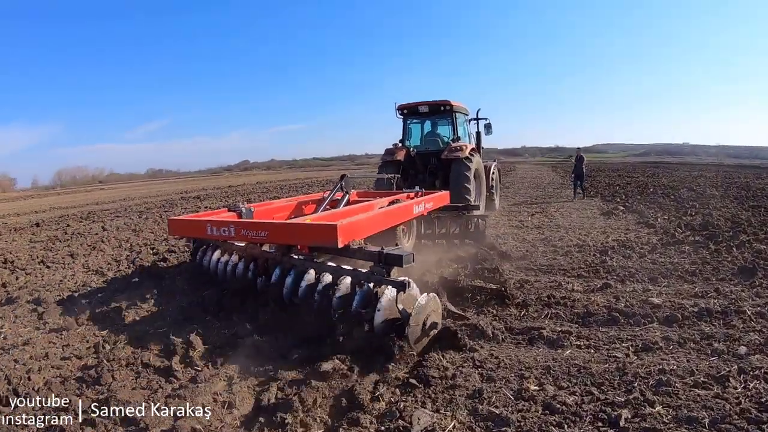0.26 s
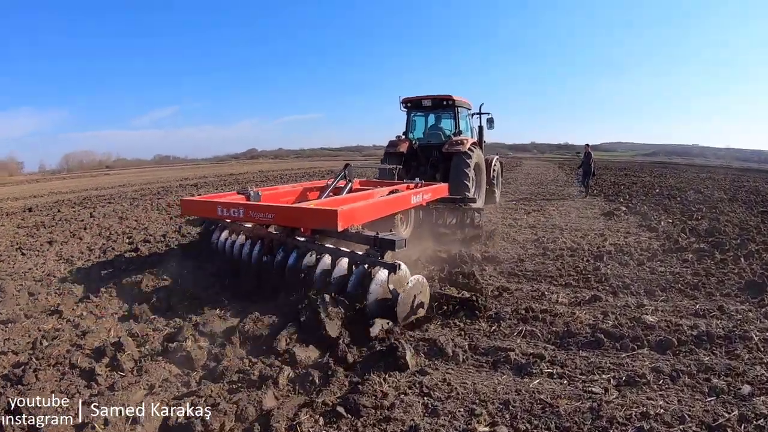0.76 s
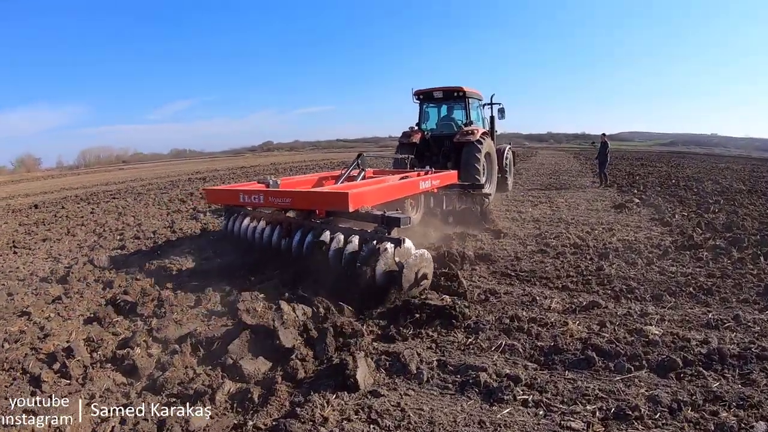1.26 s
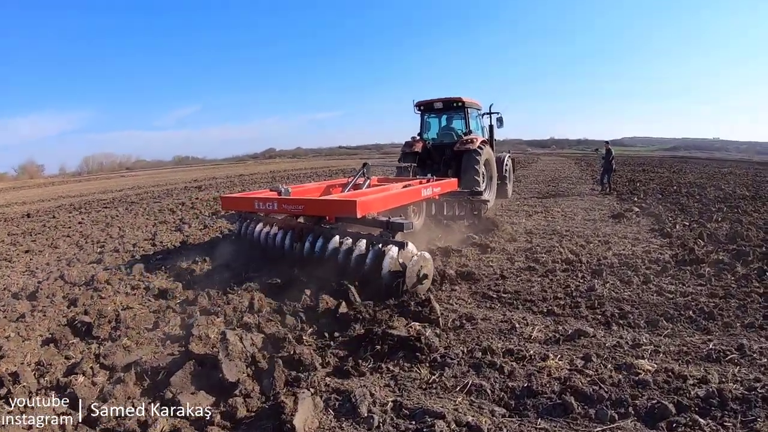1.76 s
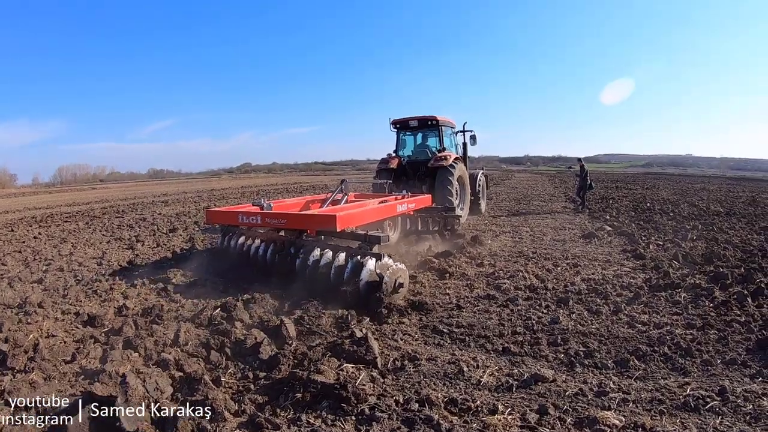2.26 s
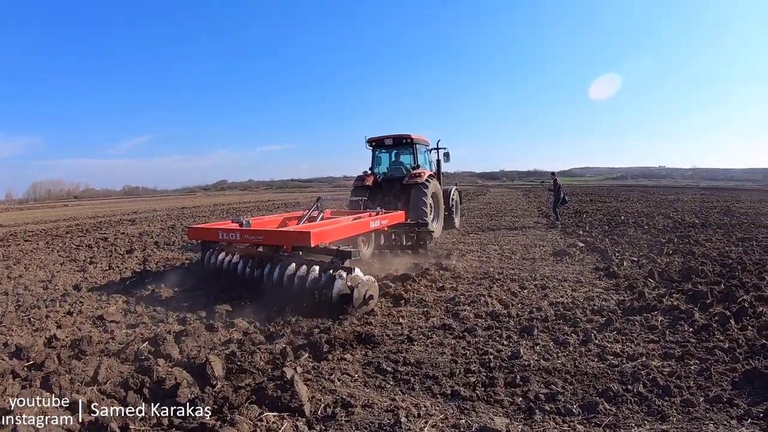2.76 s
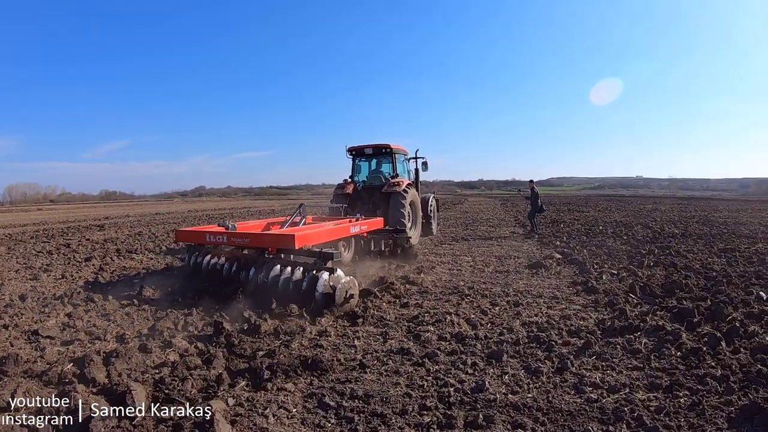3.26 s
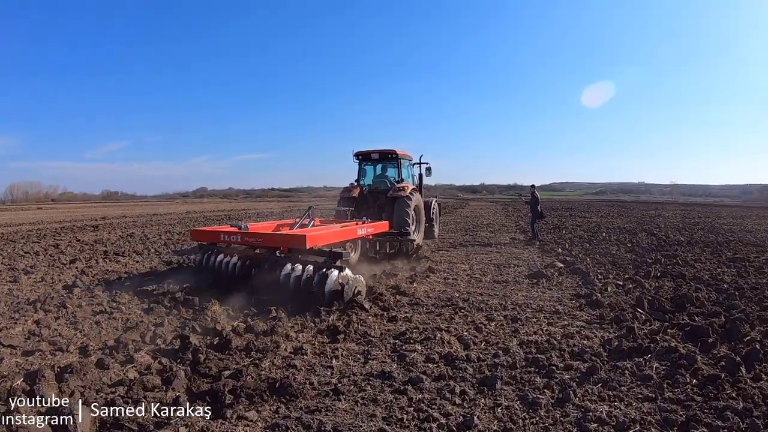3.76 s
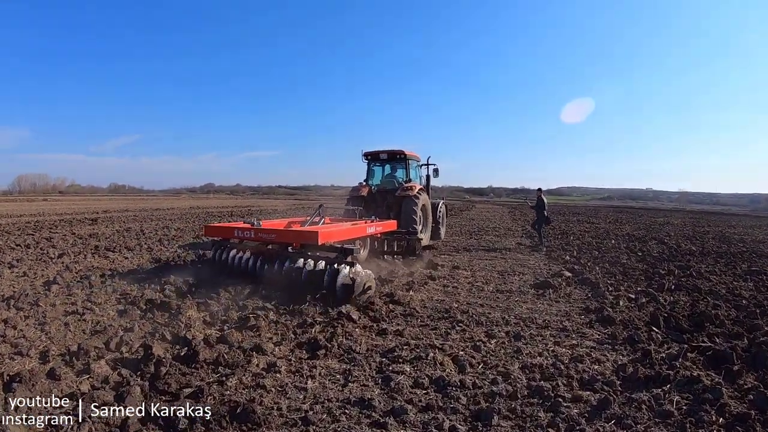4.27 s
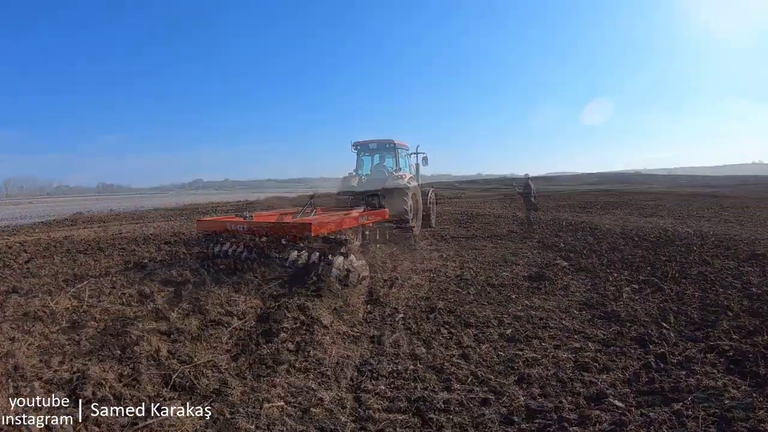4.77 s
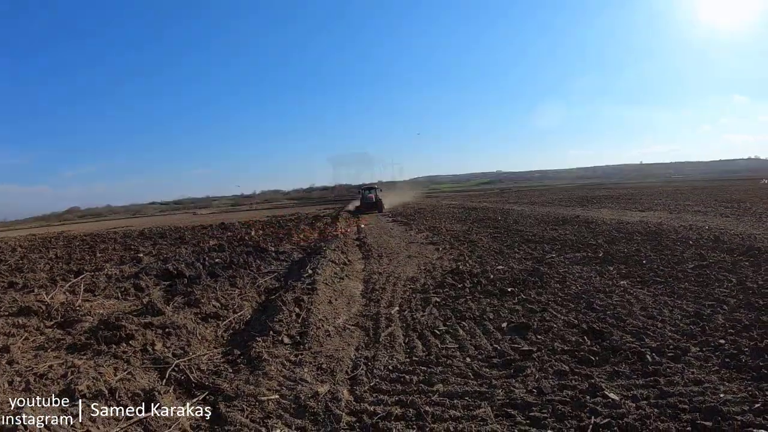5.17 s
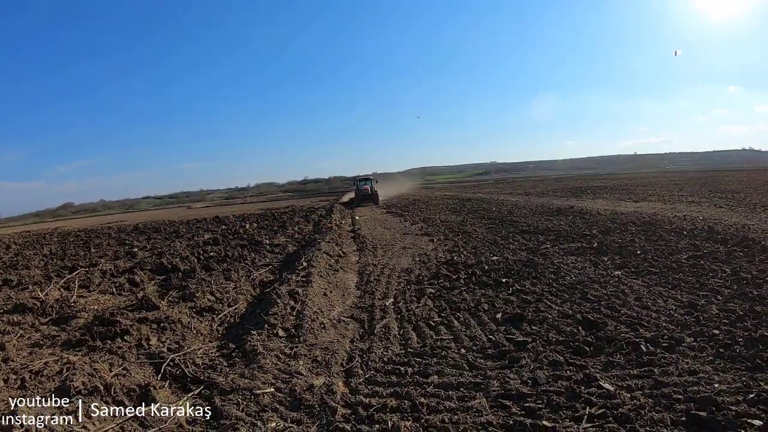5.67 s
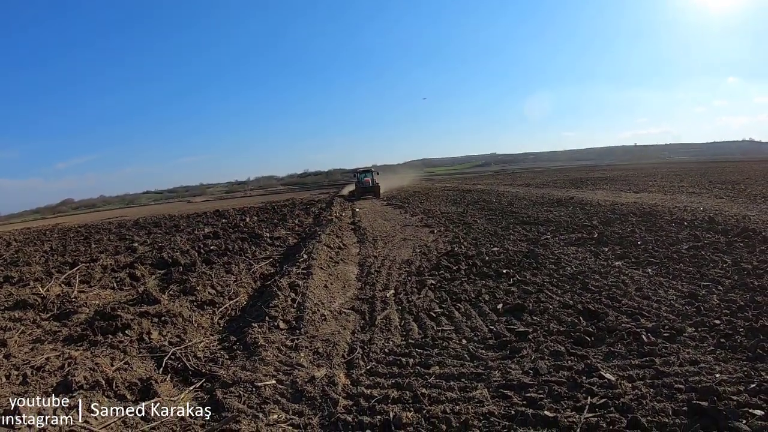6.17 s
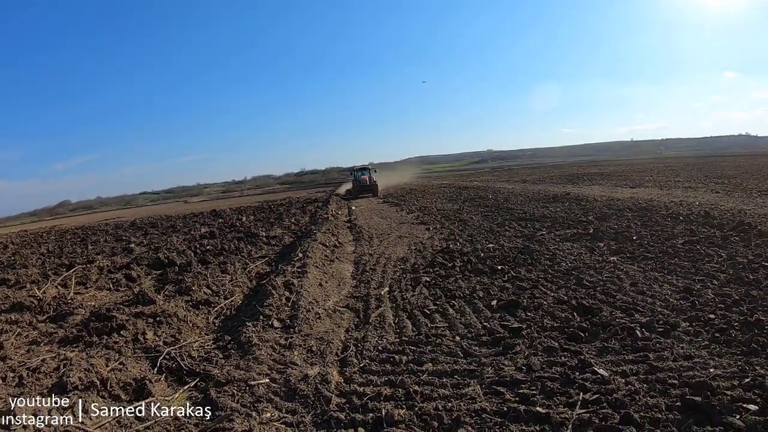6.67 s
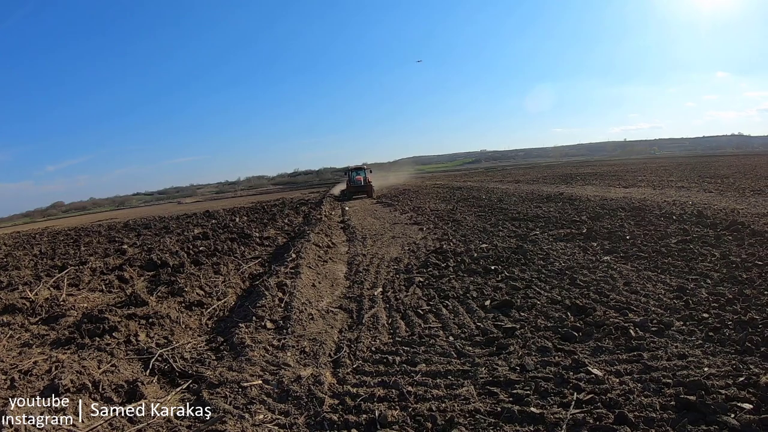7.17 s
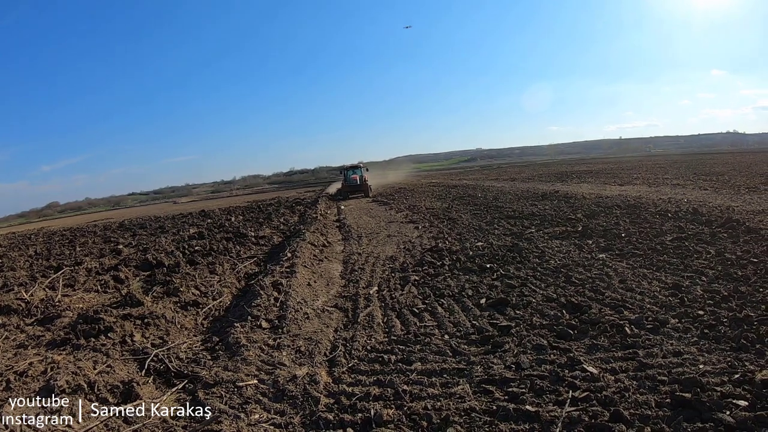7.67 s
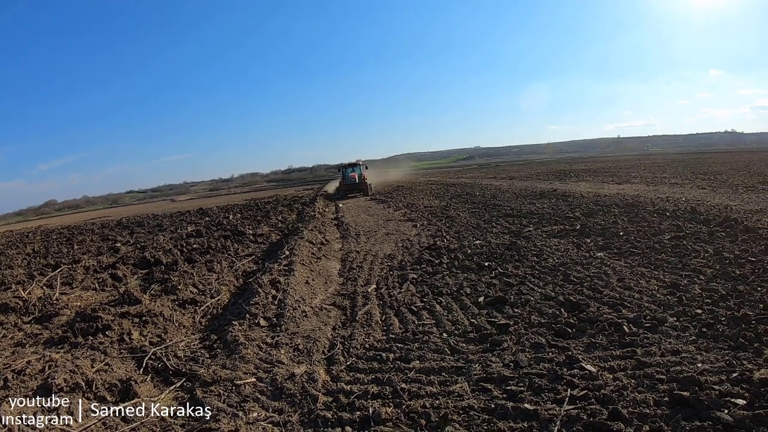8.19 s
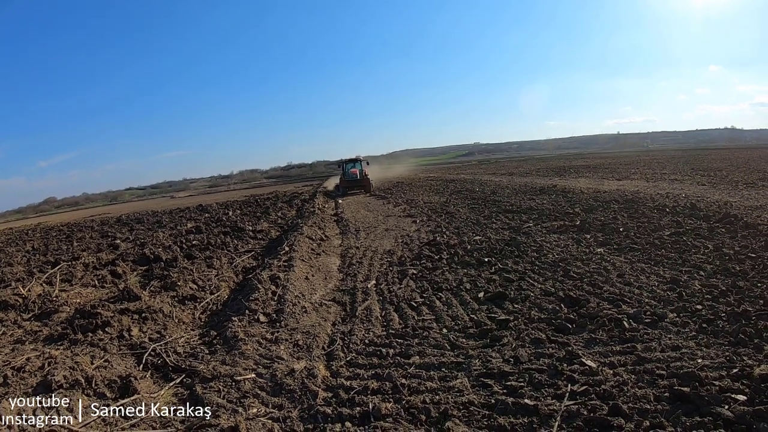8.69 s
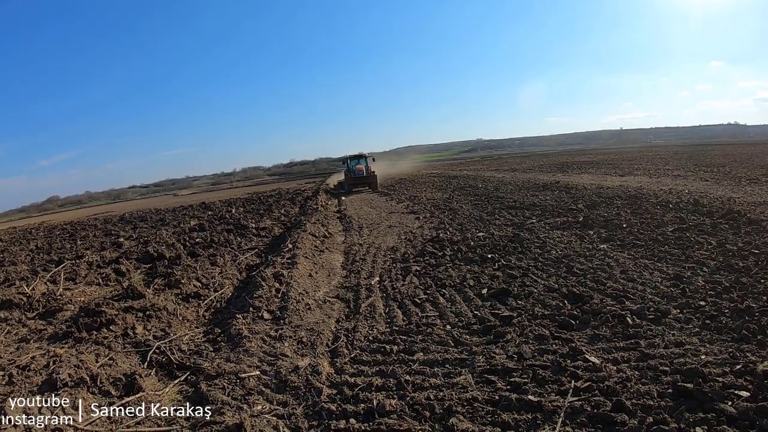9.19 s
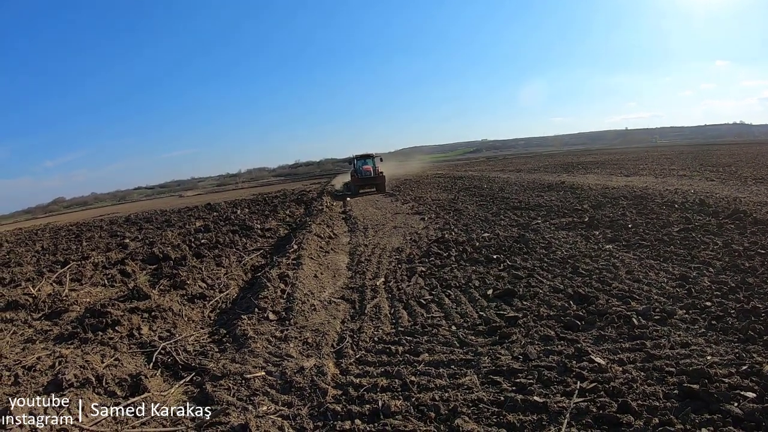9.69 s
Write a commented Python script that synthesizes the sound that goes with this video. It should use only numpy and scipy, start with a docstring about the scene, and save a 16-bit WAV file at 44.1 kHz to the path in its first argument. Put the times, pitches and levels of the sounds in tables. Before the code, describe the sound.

Steady low diesel drone, soil crackle and short steel squeaks up close; a short gap, then a distant pulsing exhaust with wind thumps and rustle.

```python
"""Tractor and disc harrow, open field

A four-cylinder diesel drags discs through dry soil, heard first from a few metres behind.
Lines locked to the firings make its drone, gated noise its clatter, random clicks the crumbling clods,
and sliding sines its gear whine and squealing disc. After a short silence it is heard from far ahead,
coming nearer: noise barks through stack resonances and an inverted ground echo, with breeze and rustle."""
import sys
import numpy as np
from scipy import signal
from scipy.fft import rfft, irfft
from scipy.io import wavfile
from scipy.ndimage import uniform_filter1d

SR = 44100
rng = np.random.default_rng(int(sys.argv[2]) if len(sys.argv) > 2 else 0)


def log_audio(samples):
    """Write samples as a 16-bit WAV file to the path given in sys.argv[1]."""
    # one column per channel
    frames = np.atleast_2d(samples).T
    # limit to full scale, then quantise
    limited = np.clip(frames, -1, 1)
    pcm = np.round(limited * 32767).astype(np.int16)
    wavfile.write(sys.argv[1], SR, pcm)


N = 438354
TIME = np.arange(N) / SR
HZ = np.maximum(np.arange(N // 2 + 1) * SR / N, 1)
LEFT_RIGHT = np.array([[1], [-1]])


def from_db(db):
    """Turn decibels into gain."""
    return 10 ** (np.asarray(db) / 20)


def rms_one(x):
    """Scale to unit rms."""
    return x / np.sqrt(np.mean(x ** 2) + 1e-20)


def in_time(rows):
    """Join each column of a timed table by straight lines, at every sample."""
    s, *columns = np.transpose(rows)
    return [np.interp(TIME, s, column) for column in columns]


def over_hz(points):
    """Join a table by straight lines on a log-frequency axis."""
    hz, value = np.transpose(points)
    return np.interp(np.log(HZ), np.log(hz), value)


def colour(x, spectrum):
    """Filter to a spectrum that falls steeply beyond its ends; rms 1."""
    low_end = 1 / (1 + (spectrum[0][0] / HZ) ** 4)
    high_end = 1 / (1 + (HZ / spectrum[-1][0]) ** 8)
    return rms_one(irfft(rfft(x) * from_db(over_hz(spectrum)) * low_end * high_end, N))


def white():
    """Two unrelated white noises."""
    return rng.standard_normal((2, N))


def drift(rate_hz):
    """Slow random wandering with spread 1: noise that falls steeply above the rate."""
    return rms_one(irfft(rfft(rng.standard_normal(N)) / (1 + (HZ / rate_hz) ** 2) ** 2, N))


def resonate(x, modes):
    """Parallel two-pole resonances, each scaled to its own rms level."""
    out = 0
    for hz, width_hz, db in modes:
        radius = np.exp(-np.pi * width_hz / SR)
        poles = [1, -2 * radius * np.cos(2 * np.pi * hz / SR), radius * radius]
        band = signal.lfilter([1, 0, -1], poles, x)
        out = out + from_db(db) * rms_one(band)
    return out


def spread(pair, width, balance):
    """Two unrelated signals become the mid and side of a stereo image."""
    mid, side = rfft(pair)
    image = mid + LEFT_RIGHT * side * from_db(over_hz(width))
    return irfft(image * from_db(LEFT_RIGHT * over_hz(balance) / 2), N)


def sinking(db, loss_db_per_s, since_s=0):
    """A level in dB that falls evenly with time; a negative loss makes it rise."""
    return db - loss_db_per_s * (TIME - since_s)


def bumps(rows, width_s):
    """A bell-shaped bump for each (time, height)."""
    return sum(height * np.exp(-((TIME - s) / width_s) ** 2) for s, height in rows)


def swells(rows, width_s):
    """The gain of short swells, each given by (time, peak dB)."""
    return bumps([(s, from_db(db)) for s, db in rows], width_s)


def grains(per_s):
    """Random clicks of unequal size, now denser and now sparser."""
    born = rng.random((2, N)) < per_s * from_db(drift(12)) / SR
    size_db = 2 * np.minimum(rng.exponential(1, (2, N)), 4)
    return rms_one(born * white() * from_db(size_db))


def engine_speed(trend, hunt):
    """Firings per second: the load sets the trend, the governor swings around it."""
    per_s, depth, crest_s = hunt
    return in_time(trend)[0] + depth * np.cos(2 * np.pi * per_s * (TIME - crest_s))


def crank(speed, jitter):
    """Firings counted since the start; the speed is never quite even."""
    return np.cumsum(speed * (1 + jitter * drift(21.7))) / SR


# Strength of the four cylinders' bangs, in firing order. Each row: level in dB.
BANG_DB = [1.6, -.2, -1.1, -.3]


def bangs(firings, start, peak, steady):
    """Each firing's burst rises and dies on a steady share; start and peak in firing cycles; rms 1."""
    number, age = np.divmod(firings + 1 - start, 1)
    number = number.astype(int)
    chance_db = 1.3 * rng.standard_normal(size=1000)[number]
    strength = from_db(np.array(BANG_DB)[number % len(BANG_DB)] + chance_db)
    burst = (age / peak * np.exp(1 - age / peak)) ** 2
    return rms_one(steady + strength * burst)


# One cylinder thuds harder than the others as its valve opens. Each row: level in dB.
THUD_DB = [-3, -1, 4, -3]
# Dull colour of a thud. Each row: frequency in Hz, relative level in dB.
THUD_COLOUR = [(200, 0), (900, 0)]


def thuds(firings, start, chance_db):
    """One dull pressure pulse per firing, in the pattern of the cylinders."""
    number = (firings + 1 - start).astype(int)
    chance = chance_db * rng.standard_normal(size=1000)[number]
    strength = from_db(np.array(THUD_DB)[number % len(THUD_DB)] + chance)
    pulses = np.diff(number, prepend=number[0])
    return colour(pulses * strength, THUD_COLOUR)


def drone(firings, orders, waver_db, uneven_db, octave_sag_db):
    """Exhaust lines add up to one suction dip in the middle of each cycle, its depth varying by chance."""
    out = 0
    for order, db in orders:
        unsteady_db = waver_db * np.sqrt(max(abs(db) - .5, 0))  # weak lines come and go most
        smear = np.pi / 10 * (order - 1) ** 2  # the silencer holds back the higher lines
        level_db = db + unsteady_db * drift(9.9) - octave_sag_db * (order == 2)
        out = out - from_db(level_db) * np.cos(2 * np.pi * order * (firings - .5) - smear)
    chance = rng.standard_normal(size=1000)
    depth_db = uneven_db * np.interp(firings - .5, np.arange(len(chance)), chance)
    return rms_one(out * from_db(depth_db))


# Left and right alike: the far tractor and the air sit in the middle.
# Each row: frequency in Hz, left minus right in dB.
CENTRED = [(100, 0), (8000, 0)]
# Gusts thumping on the microphone. Each row: time in seconds, peak in dB.
GUST_PEAKS = [(5.2, -37.5), (5.92, -33), (6.25, -43), (6.85, -51), (7.13, -39), (7.35, -36), (9.75, -40)]
# Colour of wind on the microphone. Each row: frequency in Hz, relative level in dB.
WIND_COLOUR = [(12, -6), (28, 8.5), (45, 1), (90, -3), (200, -22.5), (500, -50)]
# Stereo width of the wind. Each row: frequency in Hz, side minus mid in dB.
WIND_SIDE = [(30, -33), (200, -34)]


def breeze():
    """Low noise: lumps of wind thump on the microphone above a light, unsteady breeze."""
    blowing = from_db(-47) + swells(GUST_PEAKS, width_s=0.06)
    wind = blowing * from_db(1.6 * drift(5.4)) * colour(white(), WIND_COLOUR)
    return spread(wind, WIND_SIDE, CENTRED)


RUSTLE_FULL_S, RUSTLE_FULL_DB, RUSTLE_RISE_DB_PER_S = 8.57, -53, 26
# Swishes on top of the rustle. Each row: time in seconds, peak in dB.
SWISH_PEAKS = [(8.92, -51), (9.18, -48.5)]
# Bright colour of the rustle. Each row: frequency in Hz, relative level in dB.
RUSTLE_COLOUR = [(2500, 24), (4500, 9), (6000, 7.5), (7800, 1.5), (8600, 0.5), (9600, 0.5), (11000, -9),
                 (13000, -16)]


def bright_rustle():
    """Dense fine clicks swell to a steady level, with two swishes on top."""
    rising_db = RUSTLE_FULL_DB - RUSTLE_RISE_DB_PER_S * np.maximum(RUSTLE_FULL_S - TIME, 0)
    gain = from_db(rising_db) + swells(SWISH_PEAKS, width_s=0.07)
    rustle = gain * colour(grains(per_s=11000), RUSTLE_COLOUR)
    return spread(rustle, [(3000, -3.5), (9000, -1.5)], CENTRED)


def delayed(x, lag_s):
    """Both channels, a number of seconds later."""
    return np.array([np.interp(TIME - lag_s, TIME, channel) for channel in x])


# Bounce off the field: its lag grows as the tractor nears, and its share ends up far smaller.
# Each row: time in seconds, lag in seconds, share of the direct sound.
GROUND_BOUNCE = [(5.2, .000545, .58), (5.6, .00056, .46), (6.15, .000565, .43), (6.9, .000635, .42),
                 (7.65, .000745, .5), (8.55, .000842, .46), (9.15, .000908, .22), (9.9, .00103, .2)]
ECHO_LOW_HZ = 1340  # the notches are shallow below this


def ground_echo(x):
    """The grazing ground echo is inverted and cuts notches that sink as its lag grows."""
    lag_s, share = in_time(GROUND_BOUNCE)
    ground = uniform_filter1d(delayed(x, lag_s), size=5, axis=1)  # rough soil scatters the treble
    high_pass = signal.butter(2, ECHO_LOW_HZ, "high", fs=SR, output="sos")
    ground = signal.sosfiltfilt(high_pass, ground)
    return (x - share * ground) / np.hypot(1, share)


FAR_START_S = 5.0
# Hard puffs of exhaust. Each row: time in seconds, peak in dB.
HARD_PUFF_PEAKS = [(5.074, -26), (5.091, -25), (5.127, -19.5), (5.178, -21), (5.208, -31)]
THUMP_WIDTH_S, RUSH_WIDTH_S, RUSH_DB = 0.0032, 0.016, -8  # the rush is relative to the thump
# Soft puffs as they sink. One row: level at the far start in dB, loss in dB per second.
FAR_PUFF_LEVEL = (-36, 0.7)
# Colour of the far puffs. Each row: frequency in Hz, relative level in dB.
FAR_PUFF_COLOUR = [(30, 2), (70, -4.5), (110, 0), (160, 1), (215, -4), (280, -12.5), (500, -19)]


def far_puffs(firings, lull_db):
    """Low noise puffs at each firing; each hard puff is a thump in a short rush of gas."""
    puffing = white()[0] * bangs(firings, start=0.02, peak=0.15, steady=0.87)
    soft_gain = from_db(sinking(*FAR_PUFF_LEVEL, FAR_START_S) - lull_db)
    rush_gain = from_db(RUSH_DB) * swells(HARD_PUFF_PEAKS, RUSH_WIDTH_S)
    thumps = swells(HARD_PUFF_PEAKS, 2 * THUMP_WIDTH_S) - 2 * swells(HARD_PUFF_PEAKS, THUMP_WIDTH_S)
    return (soft_gain + rush_gain) * colour(puffing, FAR_PUFF_COLOUR) + thumps


# Exhaust stack resonances. Each row: frequency in Hz, width in Hz, relative level in dB.
STACK_RINGS = [(394, 42, -9.5), (694, 51, -1), (995, 46, -2), (1422, 100, -5), (1820, 240, -9),
               (2254, 230, -14.5), (2563, 98, -13), (2878, 66, -12.5), (3178, 120, -15), (3520, 100, -20.5),
               (3830, 69, -20), (4190, 83, -25), (4470, 170, -28)]
# Gas rushing up the stack. Each row: frequency in Hz, relative level in dB.
STACK_RUSH_COLOUR = [(250, 0), (4500, 0)]
# Combustion clatter from afar. Each row: frequency in Hz, relative level in dB.
FAR_CLATTER_COLOUR = [(230, 14.5), (330, 9), (470, 9.5), (570, -0.5), (750, 7.5), (880, 4), (1100, 6),
                      (1270, -0.5), (1600, -1), (2200, -2.5), (2750, -7.5), (3400, -13.5), (4400, -26),
                      (5400, -24.5), (7800, -30.5), (11000, -50)]
# Level of the bark as it rises slowly. One row: level at the far start in dB, loss in dB per second.
BARK_LEVEL = (-40.5, -0.15)
# Harder barking for a while. Each row: time in seconds, extra level in dB.
HARDER_BARKS = [(5.65, 2.4), (9.3, 0.33)]
# Now and then one stack resonance rings out. Each row: time in seconds, frequency in Hz, peak in dB.
STACK_RING_OUTS = [(5.18, 2620, -52), (6.5, 2900, -51), (7.05, 2590, -55), (8.5, 3230, -50.5)]
RING_OUT_WIDTH_S, RING_OUT_WIDTH_HZ = .3, 70
BARK_OPENING_DB, OPENING_CUT_HZ, OPENING_DULLNESS = 5, 2800, 0.43  # dullness: share of treble taken away
# Stereo width of the bark. Each row: frequency in Hz, side minus mid in dB.
FAR_SIDE = [(400, -48), (800, -48), (1400, -47), (2200, -60), (4000, -58), (8000, -22)]


def exhaust_bark(firings, closed):
    """Firing-gated noise through the stack and ground echo, opening from quiet and muffled."""
    knock = white() * bangs(firings, start=0.1, peak=0.38, steady=.75)
    rush = colour(white(), STACK_RUSH_COLOUR) * bangs(firings, start=0.028, peak=0.31, steady=0.61)
    stack = resonate(rush, STACK_RINGS)
    clatter = colour(knock, FAR_CLATTER_COLOUR)
    opening_db = -BARK_OPENING_DB * closed
    level_db = sinking(*BARK_LEVEL, FAR_START_S) + opening_db + bumps(HARDER_BARKS, width_s=0.51)
    bark = from_db(level_db) * ground_echo(from_db(0.5) * clatter + from_db(-3.5) * stack)
    ringing = colour(knock, STACK_RUSH_COLOUR)
    for s, hz, db in STACK_RING_OUTS:
        ring = resonate(ringing, [(hz, RING_OUT_WIDTH_HZ, 0)])
        bark = bark + swells([(s, db)], RING_OUT_WIDTH_S) * ring
    dull = signal.sosfiltfilt(signal.butter(6, OPENING_CUT_HZ, fs=SR, output="sos"), bark)
    bark = bark - OPENING_DULLNESS * closed * (bark - dull)
    return spread(bark, FAR_SIDE, CENTRED)


# Engine speed under the pull of the soil. Each row: time in seconds, firings per second.
FAR_TREND = [(5, 57.9), (5.25, 59.5), (5.7, 58.8), (6.15, 60.9), (6.75, 58.1), (7.1, 57.8), (7.35, 60.1),
             (7.7, 57.9), (8.3, 58.1), (8.75, 60.3), (9.1, 59.0), (9.9, 59.7)]
# Governor hunting. One row: swings per second, depth in firings per second, time of a crest in seconds.
FAR_GOVERNOR = (2.16, .55, 7.43)
# Exhaust lines. Each row: multiple of the firing rate, relative level in dB.
FAR_LINES = [(0.501, -30.5), (1, 1), (1.751, -18), (2, -2), (3, -10.5), (3.33, -25), (3.5, -16.5),
             (3.75, -32.5), (4, -19.5), (4.25, -34), (5.001, -37)]
# What the thuds ring in the exhaust. Each row: frequency in Hz, width in Hz, level in dB.
FAR_THUD_RINGS = [(402, 45, -48.5), (682, 24, -51)]
# The drone as its bass sinks. One row: level at the far start in dB, loss in dB per second.
FAR_DRONE_LEVEL = (-24.5, 0.5)
# The bass drops away once and comes back. Each row: time in seconds, depth in dB.
BASS_DROP = [(5.37, 10.2)]
OPENING_S, OPENING_OCTAVE_SAG_DB = 0.51, 5


def from_ahead():
    """The tractor far off: pulsing exhaust with its bark across the field."""
    firings = crank(engine_speed(FAR_TREND, FAR_GOVERNOR), jitter=0.00776)
    lull_db = bumps(BASS_DROP, width_s=0.28)
    closed = np.clip(1 - (TIME - FAR_START_S) / OPENING_S, 0, 1)
    octave_sag_db = OPENING_OCTAVE_SAG_DB * closed
    droning = drone(firings, FAR_LINES, waver_db=0.89, uneven_db=0.68, octave_sag_db=octave_sag_db)
    exhaust = from_db(sinking(*FAR_DRONE_LEVEL, FAR_START_S) - lull_db) * droning
    chug = resonate(thuds(firings, start=0.12, chance_db=2.6), FAR_THUD_RINGS)
    bass = exhaust + far_puffs(firings, lull_db) + from_db(-lull_db) * chug
    return bass + exhaust_bark(firings, closed)


# Crumbling clods, close to. Each row: frequency in Hz, relative level in dB.
SOIL_COLOUR = [(1500, 0), (4000, 0), (5500, -2.5), (7000, -6), (8200, -14), (9300, -8.5), (11000, -20),
               (13500, -32)]
# The soil as the rig pulls away. One row: level at the start in dB, loss in dB per second.
SOIL_LEVEL = (-55.5, 0.5)
# The discs throw less soil for a moment. Each row: time in seconds, depth in dB.
SOIL_DIP = [(4.4, 7.5)]


def crumbling_soil(firings):
    """Clods break in dense random clicks that pulse with the firings."""
    crumbs = grains(per_s=9000) * bangs(firings, start=0.089, peak=0.19, steady=0.7)
    level_db = sinking(*SOIL_LEVEL) - bumps(SOIL_DIP, width_s=0.27)
    return from_db(level_db) * colour(crumbs, SOIL_COLOUR)


# Ringing of the steel discs. Each row: frequency in Hz, width in Hz, level in dB.
DISC_RINGS = [(1650, 37, -54), (2690, 26, -59.5), (3040, 26, -61), (3280, 45, -69), (3690, 47, -59.5)]


def ringing_discs():
    """Sparse random clicks set the steel discs ringing on their modes."""
    return resonate(grains(per_s=500), DISC_RINGS)


# Short high squeaks of the discs. Each row: time in seconds, frequency in Hz, peak in dB.
SQUEAK_NOTES = [(0.72, 3220, -55), (1.05, 3060, -54), (1.22, 3065, -55), (1.3, 3625, -56),
                (1.41, 3660, -51.5), (1.56, 3668, -54), (1.7, 3625, -55), (1.9, 2690, -54),
                (2.07, 2682, -54), (2.2, 3065, -50), (2.35, 3052, -53), (2.65, 3065, -55),
                (2.87, 3070, -53), (3.0, 2690, -51), (3.47, 3072, -53)]


def squeaks(waver):
    """A disc catches and sings briefly on one note, with a flutter of pitch and level."""
    clock_s = np.cumsum(1 + waver * drift(64)) / SR
    notes = 0
    for s, hz, db in SQUEAK_NOTES:
        notes = notes + swells([(s, db)], width_s=.07) * np.sin(2 * np.pi * hz * clock_s)
    return np.sqrt(2) * from_db(2 * drift(25)) * notes


# A dry disc bearing nearby. Each row: time in seconds, frequency in Hz, level in dB.
BEARING_NOTE = [(3.9, 825, -90), (4.2, 822, -56), (4.4, 818, -49), (4.52, 812, -43), (4.63, 806, -38.5),
                (4.72, 812, -38), (4.8, 830, -40)]


def squeal(waver):
    """Rubbing steel sings on one sliding note with an unsteady pitch and level."""
    hz, db = in_time(BEARING_NOTE)
    cycles = np.cumsum(hz * (1 + waver * drift(60))) / SR
    return from_db(db + drift(23)) * np.sqrt(2) * np.sin(2 * np.pi * cycles)


TEETH_PER_FIRING = 22.85  # the gears are locked to the crankshaft
# Gear whine. Each row: multiple of the mesh rate, level in dB, time of the loudest moment in seconds,
# fade in dB per second squared.
GEAR_LINES = [(.462, -48, 2.7, .7), (.8183, -47.5, 1.9, .75), (1, -48, 2.4, .4), (1.443, -50.5, .9, 3.5)]


def gears(speed):
    """Meshing teeth whine in step with the engine; tones swell and fade, and backlash makes them flutter."""
    teeth = TEETH_PER_FIRING * np.cumsum(speed) / SR + .04 * drift(25)
    tones = 0
    for multiple, db, loudest_s, fade in GEAR_LINES:
        level_db = db - fade * (TIME - loudest_s) ** 2 + 1.3 * drift(5.8)
        tones = tones + from_db(level_db) * np.sqrt(2) * np.sin(2 * np.pi * multiple * teeth)
    return tones


# Combustion clatter, close to. Each row: frequency in Hz, relative level in dB.
NEAR_CLATTER_COLOUR = [(200, -3.5), (300, -3), (400, 3), (520, -1), (650, -5.5), (950, -3.5), (1130, -11.5),
                       (1300, -9), (1450, -11), (1800, -10), (2400, -14), (3200, -15), (4500, -26.5),
                       (9000, -39)]
# The clatter as the rig pulls away. One row: level at the start in dB, loss in dB per second.
NEAR_CLATTER_LEVEL = (-34, 0.5)
# Harder clatter for a while under load. Each row: time in seconds, extra level in dB.
LOADED_CLATTER = [(3.07, 1.7)]
# Ring of the gearbox housing. Each row: frequency in Hz, width in Hz, level in dB.
GEARBOX_RINGS = [(1258, 42, -56)]


def near_clatter(firings):
    """Combustion knocks are firing-gated noise, which also rings the gearbox housing."""
    knock = white() * bangs(firings, start=0.13, peak=0.37, steady=2.4)
    level_db = sinking(*NEAR_CLATTER_LEVEL) + bumps(LOADED_CLATTER, width_s=0.41) + .5 * drift(6.3)
    return from_db(level_db) * colour(knock, NEAR_CLATTER_COLOUR) + resonate(knock, GEARBOX_RINGS)


# Colour of the near puffs. Each row: frequency in Hz, relative level in dB.
NEAR_PUFF_COLOUR = [(30, -12), (70, -3.5), (110, 2), (160, -1.5), (215, -7.5), (280, -17.5), (500, -21.5)]


def near_puffs(firings):
    """Exhaust gas puffs low noise at each firing."""
    puffing = white() * bangs(firings, start=0.036, peak=0.17, steady=0.96)
    return from_db(-34.5) * colour(puffing, NEAR_PUFF_COLOUR)


# Exhaust lines. Each row: multiple of the firing rate, relative level in dB.
NEAR_LINES = [(0.501, -25), (0.753, -30), (1, 3.5), (1.248, -20), (1.502, -31), (1.751, -22), (2, 1.5),
              (2.248, -23), (3, -14), (3.499, -17.5), (4, -34), (5.001, -24), (6, -27.5)]
# The drone as the rig pulls away. One row: level at the start in dB, loss in dB per second.
NEAR_DRONE_LEVEL = (-22.5, 0.1)
USUAL_FIRING_RATE, DRONE_DB_PER_HZ = 58.3, 0.5  # the drone is louder the faster the engine runs
# The drone's octave line sags briefly. Each row: time in seconds, depth in dB.
OCTAVE_DIPS = [(1.1, 8), (2.3, 8), (3.09, 18), (4.32, 13.5)]
RIGHT_PORT_LEAK_HZ = 8


def near_exhaust(speed, firings):
    """The drone in both channels; the right microphone port leaks a little bass, shifting its phase."""
    level_db = sinking(*NEAR_DRONE_LEVEL) + DRONE_DB_PER_HZ * (speed - USUAL_FIRING_RATE)
    octave_sag_db = bumps(OCTAVE_DIPS, width_s=0.1)
    droning = drone(firings, NEAR_LINES, waver_db=.5, uneven_db=-0.1, octave_sag_db=octave_sag_db)
    exhaust = from_db(level_db) * droning
    leak = signal.butter(1, RIGHT_PORT_LEAK_HZ, "high", fs=SR, output="sos")
    return np.array([exhaust, signal.sosfilt(leak, exhaust)])


# Engine speed under the pull of the soil. Each row: time in seconds, firings per second.
NEAR_TREND = [(0, 51.0), (0.25, 56.2), (0.42, 55.6), (0.62, 57.2), (0.85, 55.1), (1.2, 53.9), (1.44, 55.8),
              (1.66, 54.7), (2.9, 54.6), (3.7, 54.7), (3.92, 55.9), (4.3, 54.3), (4.55, 53.1), (4.8, 54.1)]
# Governor hunting. One row: swings per second, depth in firings per second, time of a crest in seconds.
NEAR_GOVERNOR = (2.4, .55, 2.48)
# What the thuds ring in the exhaust. Each row: frequency in Hz, width in Hz, level in dB.
NEAR_THUD_RINGS = [(375, 36, -48.5)]
# Stereo width of the near noises. Each row: frequency in Hz, side minus mid in dB.
NEAR_SIDE = [(60, -17), (120, -17.5), (250, -43), (500, -29.5), (1000, -8.5), (2000, -15), (4000, -15.5),
             (8000, -1)]
# Their balance at the microphone. Each row: frequency in Hz, left minus right in dB.
NEAR_LEFT_RIGHT = [(100, -.2), (250, -.8), (500, -2.6), (1000, -2.2), (2000, -1.2), (4000, .7), (8000, .4)]
NEAR_TONE_PAN_DB = -1  # left minus right


def from_behind():
    """Tractor and harrow a few metres away, pulling off: drone, panned tones and wide noises."""
    speed = engine_speed(NEAR_TREND, NEAR_GOVERNOR)
    firings = crank(speed, jitter=0.0031)
    chug = resonate(thuds(firings, start=0.15, chance_db=2.5), NEAR_THUD_RINGS)
    tones = chug + gears(speed) + squeal(waver=0.0019) + squeaks(waver=0.00585)
    panned = tones * from_db(LEFT_RIGHT * NEAR_TONE_PAN_DB / 2)
    noises = near_puffs(firings) + near_clatter(firings) + crumbling_soil(firings) + ringing_discs()
    return near_exhaust(speed, firings) + panned + spread(noises, NEAR_SIDE, NEAR_LEFT_RIGHT)


# Fade-out of the place behind the harrow. Each row: time in seconds, level in dB.
BEHIND_FADE = [(0, 0.5), (4.795, 0), (4.815, -32.5), (4.84, -89)]
# Fade-in of the place far ahead. Each row: time in seconds, level in dB.
AHEAD_FADE = [(4.97, -94), (5.01, -19), (5.05, -3), (5.08, 0.5)]


def scene():
    """The two listening positions, one after the other."""
    ahead = from_db(in_time(AHEAD_FADE)[0]) * (breeze() + bright_rustle() + from_ahead())
    behind = from_db(in_time(BEHIND_FADE)[0]) * from_behind()
    return behind + ahead


def record(dry):
    """The top is cut: a steep low-pass is 70 dB down from 13600 Hz upwards."""
    return signal.sosfilt(signal.cheby2(12, 70, 13600, fs=SR, output="sos"), dry)


dry = scene()
out = record(dry)
log_audio(out)
```